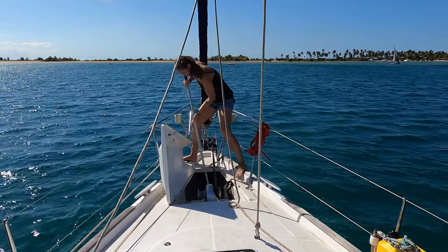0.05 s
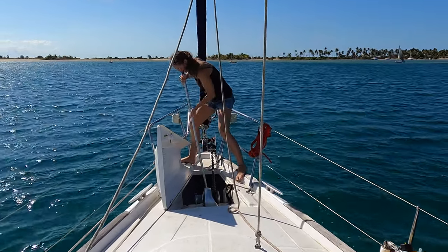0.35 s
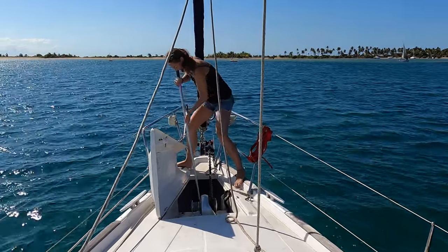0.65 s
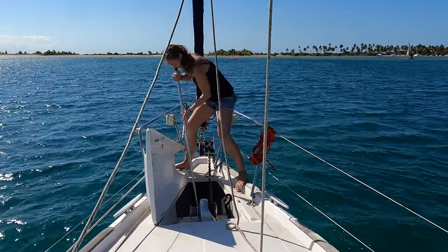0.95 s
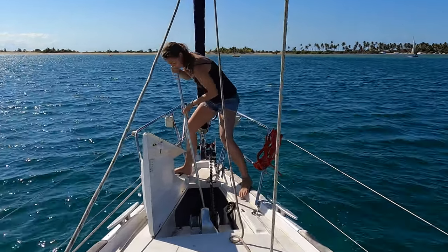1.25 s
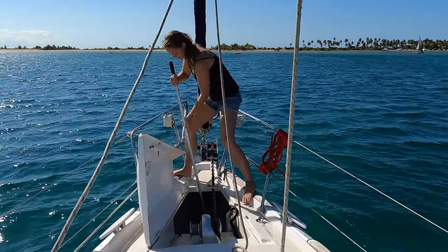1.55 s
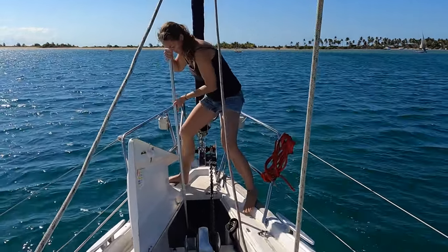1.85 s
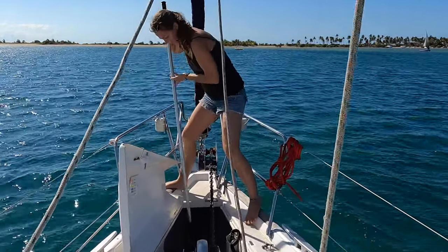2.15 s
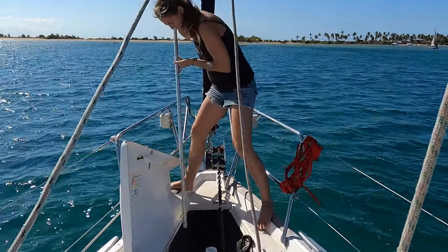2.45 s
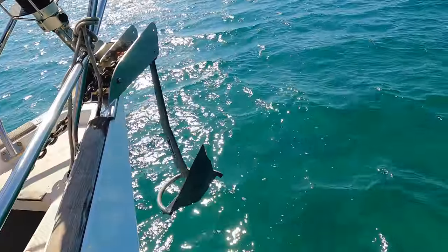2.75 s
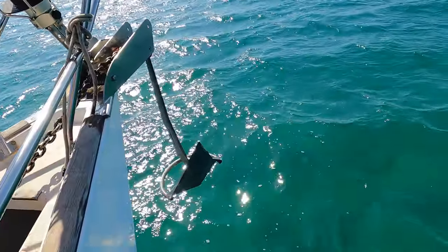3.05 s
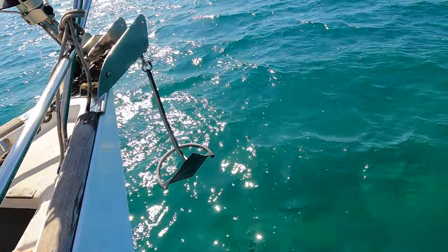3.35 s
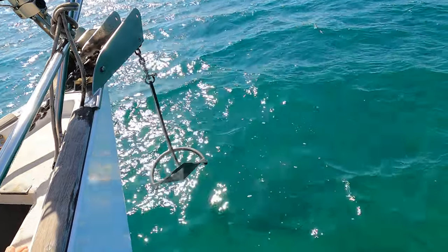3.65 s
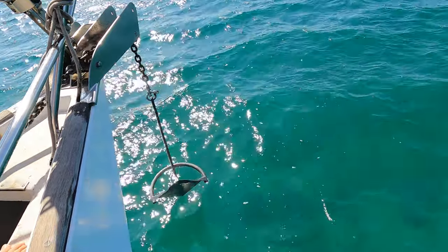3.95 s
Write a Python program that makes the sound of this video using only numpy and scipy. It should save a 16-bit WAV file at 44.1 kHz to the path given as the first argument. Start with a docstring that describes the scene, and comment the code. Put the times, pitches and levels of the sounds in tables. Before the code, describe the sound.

At a boat's bow, anchor chain links clink as they are worked loose, then clunk hard. A short squeak and thumps lead into a dense rattle as the chain pays out, with gusty microphone rumble and faint sea wash.

```python
"""Dropping anchor from a sailing boat.

Wind buffets the microphone and the sea washes below. The chain is worked loose at the windlass in
jerks: links slide and clank, ringing the metal, and one heavy clunk shakes the deck. After a lull
with a squeak and a few thumps, the bow roller spins up and the chain runs out, rattling over the
roller and drumming on the hollow hull."""
import sys
import numpy as np
from scipy import signal
from scipy.fft import rfft, irfft
from scipy.io import wavfile
from scipy.ndimage import uniform_filter1d

SR = 44100
rng = np.random.default_rng(int(sys.argv[2]) if len(sys.argv) > 2 else 0)


def transcribe(u):
    """Save the signal u as a 16-bit wav file named by the first command-line argument.

    u: samples, shape (n,) or (channels, n), limited to [-1, 1]; the rate is SR.
    q: integer samples, one column per channel.
    """
    v = np.clip(np.atleast_2d(u).T, -1, 1)
    q = np.round(v * 32767).astype(np.int16)
    wavfile.write(sys.argv[1], SR, q)


N = 176400
TIME_S = np.arange(N) / SR
RING_N = SR // 2
RING_S = np.arange(RING_N) / SR


def amp(db):
    return 10 ** (np.asarray(db) / 20)


def unit_rms(x):
    return x / np.sqrt(np.mean(x ** 2) + 1e-20)


def envelope(times_s, levels_db, fade_db_per_s=0):
    """Gain along a level curve, fading outside it."""
    outside_s = np.maximum(times_s[0] - TIME_S, 0) + np.maximum(TIME_S - times_s[-1], 0)
    return amp(np.interp(TIME_S, times_s, levels_db) - fade_db_per_s * outside_s)


def decay(t60_s):
    return np.exp(-np.log(1000) * RING_S / max(t60_s, 1e-3))


def swell(centre_s, sigma_s):
    return np.exp(-0.5 * ((TIME_S - centre_s) / sigma_s) ** 2)


def drift(rate_hz):
    """Random wander through unit-variance points."""
    return np.interp(TIME_S * rate_hz, np.arange(4000), rng.standard_normal(4000))


def noise(spectrum, size, band_hz=(10, SR / 2)):
    """Shaped, band-limited noise; rms 1."""
    hz = np.maximum(np.arange(size // 2 + 1) * SR / size, 1)
    freq_hz, level_db = np.transpose(spectrum)
    shape = amp(np.interp(np.log(hz), np.log(freq_hz), level_db))
    passband = 1 / np.sqrt((1 + (band_hz[0] / hz) ** 12) * (1 + (hz / band_hz[1]) ** 12))
    return unit_rms(irfft(rfft(rng.standard_normal(size)) * passband * shape, size))


def add(out, start_s, sound):
    start = int(np.clip(start_s * SR, 0, N - 1))
    out[start:start + len(sound)] += sound[:N - start]


def ringing(modes, spread_db, detune):
    """Damped modes, each with random strength, mistuning and phase."""
    out = 0
    for pitch_hz, level_db, t60_s in modes:
        gain = amp(level_db + spread_db * rng.standard_normal())
        hz = pitch_hz * (1 + detune * rng.standard_normal())
        out += gain * np.sin(2 * np.pi * (hz * RING_S + rng.random())) * decay(t60_s)
    return out


def contact(spectrum, modes, band_hz, crack_t60_s, tail_db, tail_t60_s, ring_db, attack_s=0.002):
    """One band of a metal impact: a crack with random resonances, a noise tail and clear modes."""
    grid_hz = np.arange(200, 16000, 170)
    freq_hz, level_db = np.transpose(spectrum)
    link_db = np.interp(np.log(grid_hz), np.log(freq_hz), level_db)
    link_db += 4.5 * rng.standard_normal(len(grid_hz))
    crack = noise(np.c_[grid_hz, link_db], RING_N, band_hz) * decay(crack_t60_s)
    tail = noise(spectrum, RING_N, band_hz) * amp(tail_db) * decay(tail_t60_s)
    in_band = [mode for mode in modes if band_hz[0] <= mode[0] < band_hz[1]]
    ring = amp(ring_db) * ringing(in_band, spread_db=3, detune=0.01)
    return (crack + tail + ring) * np.minimum(RING_S / attack_s, 1)


# Limits of the low, mid and high contact bands: edge_hz
EDGES_HZ = (400, 1400, 4800, 14000)


def blows(hits, strike, trim_db, graze_db, graze_s):
    """Hard impacts in three bands; each link grazes the metal just before it lands."""
    out = np.zeros(N)
    lead_n, touches_per_s = 4000, 500
    for start_s, level_db, low_db, high_db in hits:
        graze = amp(graze_db) * np.exp(-np.abs(TIME_S - start_s) / graze_s) * (TIME_S < start_s)
        first = max(int(start_s * SR) - lead_n, 0)
        for k, band_db in enumerate((low_db, 0, high_db)):
            impact = amp(level_db + band_db + trim_db[k]) * strike(EDGES_HZ[k:k + 2])
            add(out, start_s, impact)
            touches = (rng.random(lead_n) < touches_per_s / SR) * rng.choice([-1, 1], lead_n)
            add(out, first / SR, signal.fftconvolve(touches * graze[first:first + lead_n], impact))
    return out


def rattle(curve, strike, hits_per_s, spread_db, trim_db, links):
    """Light random contacts shared among a few differently ringing links."""
    times_s, *bands_db = np.transpose(curve)
    hits = rng.random(N) < hits_per_s / SR
    clicks = hits * amp(spread_db * np.minimum(rng.exponential(1, N), 3)) * rng.choice([-1, 1], N)
    link = rng.integers(0, links, N)
    out = 0
    for k, band_db in enumerate(bands_db):
        rings = sum(signal.oaconvolve(clicks * (link == j), strike(EDGES_HZ[k:k + 2]))[:N]
                    for j in range(links))
        running_rms = np.sqrt(np.abs(uniform_filter1d(rings ** 2, size=3500)) + 1e-6)
        out += rings / running_rms * envelope(times_s, band_db + trim_db[k], fade_db_per_s=66.5)
    return out


def glide(curve, jitter, jitter_hz, octave_db):
    """Rough rubbing tone with one overtone."""
    times_s, pitch_hz, level_db = np.transpose(curve)
    rough_hz = np.interp(TIME_S, times_s, pitch_hz) * (1 + jitter * drift(jitter_hz))
    phase = 2 * np.pi * np.cumsum(rough_hz) / SR
    tone = np.sin(phase) + amp(octave_db) * np.sin(2 * phase)
    return envelope(times_s, level_db, fade_db_per_s=1019) * tone


# Wind spectrum: freq_hz, level_db
WIND_SPECTRUM = [(15, -3.5), (38, 3.5), (75, 0), (107, -2), (134, -3.5), (179, -20), (231, -26.5),
                 (296, -23), (355, -31), (420, -29), (550, -46.5), (920, -120)]
# Gusts: time_s, level_db
GUSTS = [(0, -17.5), (.35, -13.5), (1.05, -15.5), (1.6, -19), (1.68, -14), (1.79, -21), (1.88, -13),
         (1.96, -24.5), (2.04, -13), (2.3, -19), (2.45, -13), (2.5, -25.5), (2.59, -20.5), (2.68, -14.5),
         (4, -20.5)]


def wind():
    """Gusts buffet the microphone with a low rumble."""
    return noise(WIND_SPECTRUM, N, band_hz=(12, 380)) * envelope(*np.transpose(GUSTS))


# Sea spectrum: freq_hz, level_db
SEA_SPECTRUM = [(120, -30.5), (200, 1), (356, -14.5), (494, -20), (593, -18.5), (3300, -36.5), (4130, -41),
                (10200, -61.5), (13300, -100)]


def sea():
    """Water washes softly and steadily below the bow."""
    return noise(SEA_SPECTRUM, N, band_hz=(220, 12000)) * amp(-39)


# Hull resonances: pitch_hz, width_hz, level_db
HULL_MODES = [(117, 34, 1.5), (178.4, 17, 4.5), (264.3, 17, -9.5), (308.8, 34, -3), (414, 55, -11.5),
              (581.7, 16, -12.5)]
# Drumming envelope: time_s, level_db
DRUM_LEVELS = [(0, -38), (1.7, -35.5), (2.55, -48.5), (2.72, -23.5), (2.95, -32), (3.1, -21.5),
               (3.35, -19.5), (3.7, -16)]


def hull_drumming(bumps_per_s=400):
    """Dense bumps from the moving chain excite the hollow hull."""
    hull = 0
    for pitch_hz, width_hz, level_db in HULL_MODES:
        bumps = (rng.random(N) < bumps_per_s / SR) * rng.standard_normal(N)
        resonator = signal.iirpeak(pitch_hz, pitch_hz / width_hz, fs=SR)
        hull += amp(level_db) * unit_rms(signal.lfilter(*resonator, bumps + 1e-18))
    bandpass = signal.butter(2, [90, 800], "band", fs=SR, output="sos")
    return envelope(*np.transpose(DRUM_LEVELS)) * unit_rms(signal.sosfilt(bandpass, hull))


# Windlass impact spectrum: freq_hz, level_db
WINDLASS_SPECTRUM = [(240, -41), (400, 4), (532, -7), (593, 0.5), (890, 5), (1300, -3), (1750, 3.5),
                     (2180, -4), (3060, -0.5), (4470, -13.5), (7280, -29), (10200, -41), (13300, -58),
                     (22000, -120)]
# Windlass resonances: pitch_hz, level_db, t60_s
WINDLASS_RING = [(660, -11.5, 0.067), (777, -8, 0.27), (911, -9, 0.19), (1009, -2.5, 0.11),
                 (1750, -1.5, 0.11), (2008, -11, 0.054), (2980, -10.5, 0.11), (3320, -14.5, 0.059),
                 (7160, -21, .07)]


def windlass_contact(band_hz):
    """A link strikes the windlass."""
    return contact(WINDLASS_SPECTRUM, WINDLASS_RING, band_hz,
                   crack_t60_s=0.052, tail_db=-10, tail_t60_s=0.24, ring_db=-6.5)


# Sliding chain envelope: time_s, low_db, mid_db, high_db
SLIDE_LEVELS = [(0, -45.5, -38.5, -54.5), (.12, -33, -48, -40.5), (.24, -32, -49, -46.5),
                (.39, -54, -54, -59), (.44, -43, -46.5, -47), (.53, -30, -41, -42.5), (.65, -45, -52, -55),
                (.69, -33.5, -34, -47), (.78, -35, -44.5, -51.5), (.92, -45.5, -42, -40.5),
                (1.03, -30.5, -27, -33.5), (1.1, -26, -37.5, -48), (1.19, -31.5, -32.5, -39.5),
                (1.28, -49, -46.5, -43.5), (1.39, -35, -44, -43), (1.47, -40.5, -53, -59),
                (1.57, -20.5, -20.5, -27.5), (1.63, -33.5, -51, -78), (1.75, -36, -49, -52),
                (1.83, -49.5, -50, -58), (2.1, -46.5, -58.5, -79)]


def chain_sliding():
    """Loose links slide over the windlass in jerks."""
    return rattle(SLIDE_LEVELS, windlass_contact, hits_per_s=400, spread_db=5.5,
                  trim_db=(-1, -1, -1), links=5)


# Windlass impacts: start_s, level_db, low_vs_mid_db, high_vs_mid_db
CLANK_HITS = [ (0.169, -4.5, -10.5, -13), (0.178, -15, 3.5, -24), (0.418, -29.5, 7, -6),
              (0.505, -27.5, 8.5, -16), (0.525, -24.5, 12.5, -22), (0.537, -21.5, 7, -6),
              (0.563, -7, -12, -30), (0.612, -24, 6, -28), (0.664, -13, -3, -22), (0.966, -7, -14, -16.5),
              (0.98, -11, -15, -17), (1.006, -7, -7, -21), (1.031, -17, -5, -11), (1.134, -7.5, -3.5, -22),
              (1.163, -14, -18, -24), (1.316, -7, -23, -11.5), (1.329, -6, -12, -23),
              (1.393, -16.5, -17, -6.5), (1.5, -21.5, 2, -25), (1.544, -11, 0.5, -8),
              (1.562, -6.5, -4.5, -10.5), (1.837, -28.5, 1.5, -24), (2.008, -26.5, 1, -30),
              (2.098, -26, 11, -26), (2.133, -29.5, -8, -10.5)]


def windlass_clanks():
    """Links land hard on the windlass as the chain is worked loose."""
    return blows(CLANK_HITS, windlass_contact, trim_db=(-6, -7, -7), graze_db=-13, graze_s=0.0077)


# Deck spectrum: freq_hz, level_db
DECK_SPECTRUM = [(100, -71), (200, 11), (300, 8), (450, -4), (800, -15.5), (1500, -27.5), (6000, -75)]
# Blows on the deck: start_s, level_db, t60_s, treble_db
DECK_HITS = [(0.337, -13, 0.057, 11), (0.353, -18, 0.059, 12), (1.582, -17, 0.24, -12),
             (1.891, -20, 0.13, 5), (2.043, -19, 0.059, -22), (2.721, -13, 0.1, 7.5), (2.79, -17, 0.11, 9),
             (2.815, -13, 0.081, 0.5), (2.978, -19, 0.16, 8.5), (3.714, -14.5, 0.12, 13)]


def deck_thumps():
    """Heavy blows make the deck thud."""
    out = np.zeros(N)
    for start_s, level_db, t60_s, treble_db in DECK_HITS:
        spectrum = [(hz, db + treble_db * np.clip(np.log2(hz / 350), 0, 1)) for hz, db in DECK_SPECTRUM]
        thud = noise(spectrum, RING_N) * decay(t60_s) * (1 - decay(0.0068))
        add(out, start_s, amp(level_db) * thud)
    return out


# Low swells in the hull: centre_s, pitch_hz, level_db
HULL_BOOMS = [(0.355, 88.15, -10.5), (1.722, 118.4, -11), (1.885, 107.7, -15), (2.652, 123.7, -8.5)]


def hull_booms(sigma_s=0.019):
    """The hollow bow booms for a few cycles at a time."""
    out = 0
    for centre_s, pitch_hz, level_db in HULL_BOOMS:
        tone = np.sin(2 * np.pi * (pitch_hz * TIME_S + rng.random()))
        out += amp(level_db) * swell(centre_s, sigma_s) * tone
    return out


# Scrape swells: centre_s, sigma_s, level_db; the very short swell at 2.531 s is a tick just before the squeak
LINK_SCRAPES = [(0.841, 0.016, -28.5), (1.186, 0.017, -33.5), (1.659, 0.015, -38.5), (1.733, 0.036, -39.5),
                (2.396, 0.013, -44), (2.531, .003, -48.5), (2.594, 0.024, -48.5), (3.394, 0.011, -23.5)]


def link_scrapes():
    """Links scrape over metal in short, bright, gritty swells, and a brief gritty tick leads into the squeak."""
    swells = sum(amp(db) * swell(centre_s, sigma_s) for centre_s, sigma_s, db in LINK_SCRAPES)
    spectrum = [(1500, -6), (4200, 1.5), (7500, -12), (11000, -26), (15000, -42)]
    grit = noise(spectrum, N, band_hz=(1500, 14000))
    return grit * swells * amp(drift(rate_hz=400))


# Notes of single links: start_s, pitch_hz, level_db, t60_s
LINK_CHIMES = [(0.948, 3280, -15, 0.096), (0.962, 1760, -18.5, 0.26), (0.977, 2980, -20, 0.15),
               (1.005, 2850, -20, 0.1), (3.146, 2330, -20.5, 0.07), (3.234, 1195, -17, 0.23),
               (3.274, 3470, -17.5, 0.082), (3.789, 2465, -20, .08), (3.856, 2430, -20, 0.089),
               (3.92, 2285, -13, 0.05), (3.923, 7000, -31, 0.051), (3.951, 2370, -12.5, 0.041)]


def link_chimes():
    """A link hangs free for a moment and rings with a clear note."""
    out = np.zeros(N)
    for start_s, pitch_hz, level_db, t60_s in LINK_CHIMES:
        note = np.sin(2 * np.pi * pitch_hz * RING_S) * decay(t60_s) * (1 - decay(0.011))
        add(out, start_s, amp(level_db) * note)
    return out


# Resonances of the windlass on its mount: pitch_hz, level_db, t60_s
MOUNT_MODES = [(296.5, -1, 0.079), (334, -20, 0.41), (900, -18.5, 0.27), (1243, -11, 0.1), (2310, -27, .22),
               (2490, -25, .2)]


def heavy_clunk(start_s=1.563):
    """A hard crack, then the whole windlass swings up on its mount and rings on."""
    out = np.zeros(N)
    crack = noise([(3300, 0), (7500, -19), (14000, -57)], RING_N) * decay(0.035)
    ring = ringing(MOUNT_MODES, spread_db=1.5, detune=0) * (1 - decay(0.039))
    add(out, start_s, ring + amp(-14) * crack)
    return out


# Squeak contour: time_s, pitch_hz, level_db
SQUEAK_GLIDE = [(2.559, 3670, -44), (2.564, 3080, -23.5), (2.568, 2280, -29), (2.576, 2150, -42)]


def squeak():
    """A short rubbing squeak falls in pitch."""
    return glide(SQUEAK_GLIDE, jitter=0.16, jitter_hz=1500, octave_db=-10.5)


# Roller impact spectrum: freq_hz, level_db
ROLLER_SPECTRUM = [(240, -28.5), (400, 0), (593, -15), (670, -16.5), (832, -8.5), (1230, -13.5), (2270, -1),
                   (3060, -11.5), (4010, -13), (6100, -30), (7180, -29), (10200, -50), (13300, -76),
                   (22000, -120)]
# Roller resonances: pitch_hz, level_db, t60_s
ROLLER_RING = [(840, 0, 0.13), (991.6, -2.5, 0.19), (1127, -2.5, 0.15), (1830, -1, 0.18),
               (2216, -7.5, 0.087), (3450, -5, 0.067), (3950, -11.5, 0.15), (5100, -7, 0.16),
               (7100, -16, 0.058)]


def roller_contact(band_hz):
    """A link strikes the bow roller."""
    return contact(ROLLER_SPECTRUM, ROLLER_RING, band_hz,
                   crack_t60_s=0.081, tail_db=-22, tail_t60_s=0.15, ring_db=-9)


# Running chain envelope: time_s, low_db, mid_db, high_db
RUN_LEVELS = [(2.97, -64, -58, -60), (3.07, -28, -31, -51), (3.13, -32.5, -38.5, -49),
              (3.24, -28, -26, -44.5), (3.42, -22.5, -28, -40), (3.7, -25, -29, -43), (4, -25, -31, -43)]


def chain_running():
    """The chain runs out over the roller in a dense rattle."""
    return rattle(RUN_LEVELS, roller_contact, hits_per_s=220, spread_db=2,
                  trim_db=(-0.5, -1, -0.5), links=6)


# Spin-up contour: time_s, pitch_hz, level_db
SPIN_GLIDE = [(3.0, 586.5, -36), (3.02, 772, -24), (3.042, 909, -17), (3.062, 1068, -26.5),
              (3.09, 1320, -33), (3.14, 1500, -43)]


def roller_spin():
    """The roller rubs with a rising tone as it spins up."""
    return glide(SPIN_GLIDE, jitter=0.1, jitter_hz=1000, octave_db=-17.5)


# Roller impacts: start_s, level_db, low_vs_mid_db, high_vs_mid_db
KNOCK_HITS = [(3.1491, -18.5, -1, -17), (3.1767, -10, -5, -18), (3.229, -7.5, -8, -21),
              (3.2795, -7.5, -26, -16.5), (3.3438, -6.5, -18, -20), (3.4004, -10.5, 1, -29),
              (3.458, -14, 4, -25), (3.5309, -8, -1.5, -30), (3.5844, -8.5, -0.5, -21),
              (3.6431, -9.5, 0.5, -11), (3.713, -16, 9.5, -29), (3.7944, -8.5, -17, -33),
              (3.8541, -8, -17, -21), (3.9165, -13, 4.5, -17), (3.9509, -15.5, -6, -29)]


def roller_knocks():
    """Single links knock hard over the spinning roller."""
    return blows(KNOCK_HITS, roller_contact, trim_db=(-7, -8, -7), graze_db=-13.5, graze_s=0.02)


def scene():
    """Everything at the bow, in mono."""
    metal = squeak() + windlass_clanks() + heavy_clunk() + chain_sliding()
    metal += roller_knocks() + chain_running() + link_chimes() + roller_spin() + link_scrapes()
    boat = deck_thumps() + hull_drumming() + hull_booms()
    return (metal + boat + wind() + sea())[None]


def record(dry):
    """Soft clip, then a steep low-pass."""
    ceiling, stopband_hz = 0.95, 15000
    rounded = dry / (1 + np.abs(dry / ceiling) ** 6) ** (1 / 6)
    return signal.sosfilt(signal.cheby2(12, 70, stopband_hz, fs=SR, output="sos"), rounded)


dry = scene()
out = record(dry)
transcribe(out)
```